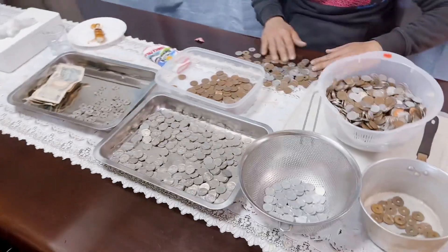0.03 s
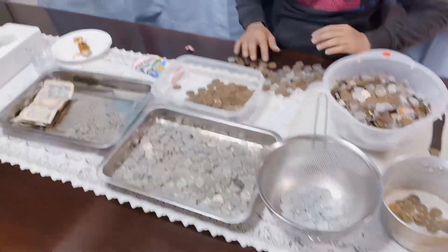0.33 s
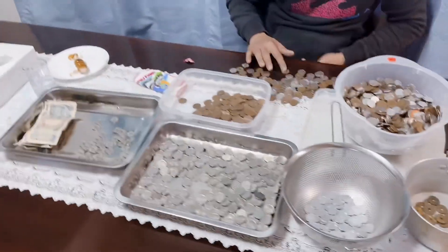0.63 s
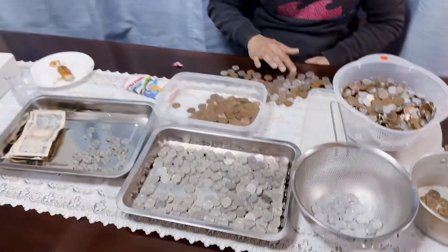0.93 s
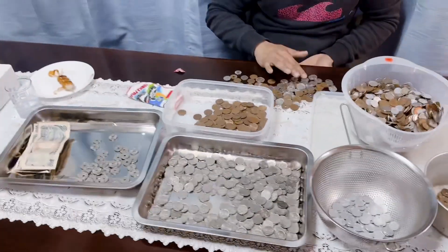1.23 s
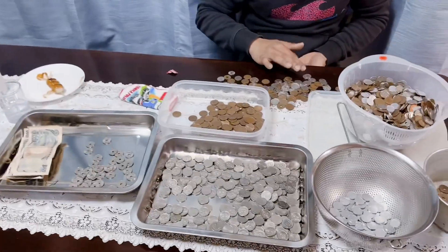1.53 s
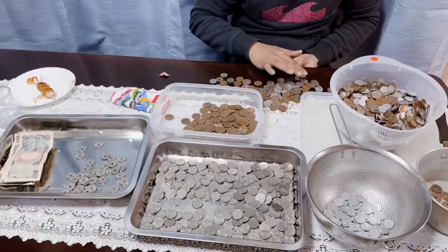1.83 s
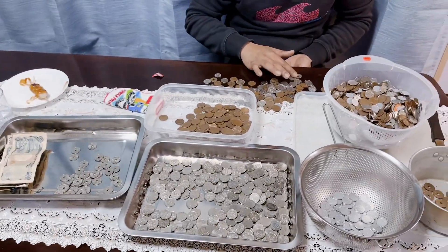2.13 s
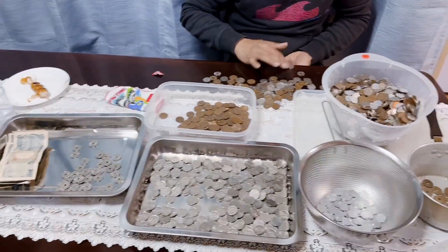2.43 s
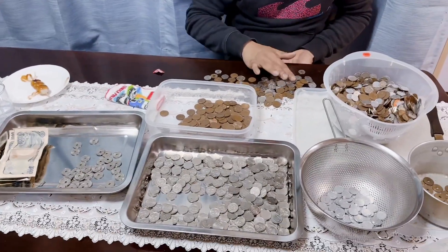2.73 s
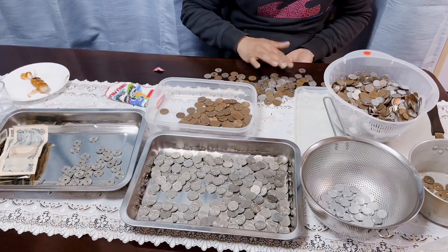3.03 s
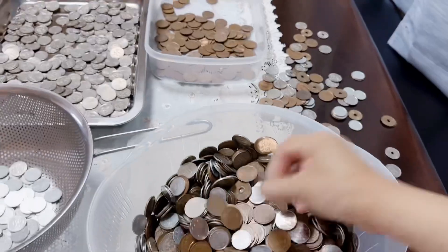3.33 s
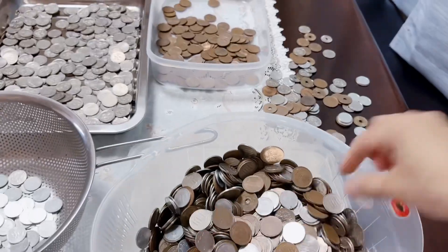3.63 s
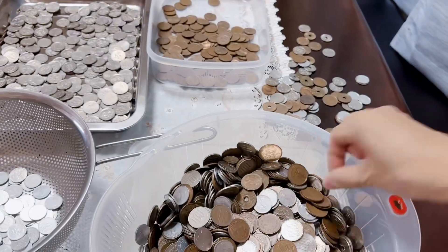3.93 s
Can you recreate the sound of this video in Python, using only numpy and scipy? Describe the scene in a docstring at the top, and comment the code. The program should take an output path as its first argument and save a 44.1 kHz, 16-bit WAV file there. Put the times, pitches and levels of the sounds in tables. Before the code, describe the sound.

Coins scrape and tap on a wooden table as fingers sort them, a few steps away in a small humming room. Then, close up, a hand digs into a plastic tub of coins and drops more in.

```python
"""Coins on wood and in a tub

A few steps away in a small, humming room, fingers slide and set down coins on a wooden table,
and two coins click in the hand. Then, close by, a hand digs into a plastic tub of coins and drops
more onto the heap. Collisions and stick-slip friction drive the resonances: wood and plastic
sound the lower notes, the metal ticks and rings high above them."""
import sys
import numpy as np
from scipy import signal
from scipy.fft import rfft, irfft
from scipy.io import wavfile
from scipy.ndimage import map_coordinates

SR = 44100
rng = np.random.default_rng(int(sys.argv[2]) if len(sys.argv) > 2 else 0)


def bounce(signal):
    """Save signal as a 16-bit WAV file at the path given by the first command-line argument."""
    frames = np.transpose(np.atleast_2d(signal))
    limited = np.clip(frames, -1, 1)
    pcm = np.round(limited * 32767).astype(np.int16)
    wavfile.write(sys.argv[1], SR, pcm)


N = 176400


def amp(db):
    """Amplitude ratio of a level in decibels."""
    return 10 ** (np.asarray(db) / 20)


def unit(x):
    """Normalisation to unit energy."""
    return x / np.sqrt(np.sum(x ** 2) + 1e-20)


def read(points, hz):
    """Interpolation of rows (f/Hz, value) on a logarithmic frequency axis."""
    f, value = np.transpose(points)
    return np.interp(np.log(hz + 1), np.log(f + 1), value)


def add(mix, s, sound):
    """Superposition: a sound joins the mix at s seconds."""
    part = mix[max(round(s * SR), 0):][:len(sound)]
    part += sound[:len(part)]


def above(x, hz):
    """Third-order high-pass filter."""
    return signal.sosfilt(signal.butter(3, hz, "high", fs=SR, output="sos"), x)


def below(x, hz):
    """Second-order low-pass filter."""
    return signal.sosfilt(signal.butter(2, min(hz, SR / 3), fs=SR, output="sos"), x)


def colour(spectrum, size=2048):
    """Minimum-phase impulse response: the phase follows from the log gain by Hilbert transform."""
    log_gain = np.log(amp(read(spectrum, abs(np.fft.fftfreq(size, 1 / SR)))))
    transfer = np.exp(np.conj(signal.hilbert(log_gain)))
    return unit(np.fft.ifft(transfer).real[:size // 2])


def band(hz, width_hz, size):
    """Narrow-band noise of rms 1: its components beat, so it sounds like a wavering tone."""
    f = np.fft.rfftfreq(N, 1 / SR)
    spectrum = rfft(rng.standard_normal(N)) / (1 + (2 * (f - hz) / width_hz) ** 4)
    return unit(irfft(spectrum, N)[:size]) * np.sqrt(size)


def air(spectrum, db, hums):
    """Stationary room noise: a continuous spectrum plus narrow bands of hum."""
    gain = amp(read(spectrum, np.fft.rfftfreq(N, 1 / SR)))
    noise = unit(irfft(rfft(rng.standard_normal(N)) * gain, N)) * np.sqrt(N)
    return amp(db) * noise + sum(amp(hum_db) * band(hz, width, N) for hz, width, hum_db in hums)


def far_air():
    """Ambient noise a few steps from the table, humming mainly near 120 Hz."""
    spectrum = [(20, -29), (45, -4.5), (120, -4), (230, -13.5), (600, -15.5), (1900, -20), (4200, -30.5),
                (6200, -42.5), (10200, -46), (11800, -59), (14000, -48), (16000, -55)]  # noise: f/Hz, relative level/dB
    hums = [(60, 3.6, -69), (119.6, 25.5, -49)]  # hum bands: f/Hz, width/Hz, level/dB
    return air(spectrum, db=-45, hums=hums)


def near_air():
    """Ambient noise beside the tub, with one low hum and one in the midrange."""
    spectrum = [(25, -33), (50, -15.5), (90, -1), (220, -12.5), (560, -12.5), (700, -19), (1200, -19),
                (1600, -29), (2300, -33.5), (5000, -45), (9500, -49), (11500, -57), (16000, -49)]  # noise: f/Hz, relative level/dB
    hums = [(60, 2.6, -56), (521, 5, -57)]  # hum bands: f/Hz, width/Hz, level/dB
    return air(spectrum, db=-47.5, hums=hums)


def room(x, early_db, tail_db, tails=3, hand_moves_per_s=4):
    """Reverberation: early reflections, then a diffuse tail whose treble is absorbed first."""
    echoes = [(.0062, -3), (.0074, -20), (.0092, -5.5), (0.0183, -16)]  # reflections: delay/s, level/dB re early_db
    decay_times = [(150, 1), (1000, 0.39), (2500, 0.36), (6000, 0.32), (10000, 0.24), (15000, 0.17)]  # reverberation time: f/Hz, T60/s
    out = x.copy()
    for delay, db in echoes:
        add(out, delay, amp(db + early_db) * x)
    moves = np.arange(N) / SR * hand_moves_per_s
    for k in range(tails):
        hz, t, noise = signal.stft(rng.standard_normal(SR * 3 // 4), SR, nperseg=256)
        envelope = amp(-60 * t / read(decay_times, hz)[:, None]) * np.minimum(t / 0.0067, 1)
        tail = signal.istft(noise * envelope, SR, nperseg=256)[1]
        share = np.cos(np.pi * (moves + k / tails)) * np.sqrt(2 / tails)  # shifts as the hands move
        out += amp(tail_db) * signal.fftconvolve(x * share, unit(tail))[:N]
    return out


def thumps():
    """Soft impact: hands bumping the table excite only a brief, low boom."""
    bumps = [(.293, 0.089, -36.5, 136.5), (0.764, 0.08, -38.5, 118.2), (3.124, 0.076, -38.5, 97.4)]  # hand bumps: t/s, duration/s, level/dB, f/Hz
    out = np.zeros(N)
    for s, length, db, hz in bumps:
        t = np.arange(0, length, 1 / SR)
        boom = np.sin(2 * np.pi * hz * t) + 0.53 * band(hz, width_hz=120, size=len(t))
        swell = np.sin(np.pi * (t / length) ** 0.67)
        add(out, s, amp(db) * np.sqrt(len(t)) * unit(boom * swell))
    return out


def ring(modes, t60_s, size=8192):
    """Free vibration: each mode (f/Hz, relative level/dB) is an exponentially damped sine."""
    t = np.arange(size) / SR
    return unit(sum(amp(db - 60 * t / t60_s) * np.sin(2 * np.pi * (hz * t + rng.random()))
                    for hz, db in modes))


def coin(hz, spread_hz, count=9):
    """Mode cluster: touching coins of one kind ring at nearly one pitch; more coins, wider spread."""
    offsets = np.linspace(-1, 1, count) + rng.uniform(-0.71, 1, count) / count
    return ring([(hz + spread_hz * z, -9 * z ** 2) for z in offsets], t60_s=0.019)


def patchy(x, patch_hz=415.5, patch_s=0.00603, depth_db=2.5):
    """Spectral modulation: the colour flickers as the contact wanders from coin to coin."""
    hz, t, spectrum = signal.stft(np.pad(x, (0, 256)), SR, nperseg=256)
    grid = np.meshgrid(hz / patch_hz, t / patch_s, indexing="ij")
    field = map_coordinates(rng.standard_normal((128, 128)), grid, order=1, mode="mirror")
    flicker = amp(depth_db * field / field.std())
    return np.linalg.norm(x) * unit(signal.istft(spectrum * flicker, SR, nperseg=256)[1])


def contact(decay_s, size=1024):
    """Hard contact: a spray of tiny collisions, over in milliseconds and therefore broadband."""
    age = np.arange(size) / SR / decay_s
    fade = np.sqrt(age) * np.exp(-age)
    spectrum = rfft(rng.standard_normal(size) * fade)
    whitened = irfft(spectrum / abs(spectrum))
    return unit(whitened * np.sqrt(fade)) * np.sqrt(0.0019 * SR)  # the energy of 1.9 ms at rms 1


def slips(length, per_s, spread_db=3.5, rise_s=0.0034, fall_s=0.014):
    """Stick-slip friction: a random train of uneven impulses under a stroke that rises and fades."""
    t = np.arange(0, length, 1 / SR)
    chance, strength, sign = rng.random((SR // 2, 3))[:len(t)].T
    height = amp(spread_db * np.minimum(-np.log(strength), 3))
    train = (chance < per_s / SR) * np.sign(sign - .5) * height
    stroke = np.minimum(t / rise_s, 1) * np.minimum((length - t) / fall_s, 1)
    return patchy(unit(train * stroke) * np.sqrt(len(t)))


def excite(drive, parts, size=32768):
    """Forced response: convolution with each part (impulse response, level/dB re the drive)."""
    spectrum = rfft(drive, size)
    responses = (amp(db) * unit(irfft(spectrum * rfft(response, size))) for response, db in parts)
    return np.linalg.norm(drive) * sum(responses)


def hand_clicks():
    """Light damping: coin clicks on coin in the fingers, and the loosely held one rings on."""
    # coin clicks: t/s, level/dB; the last row is a second contact of the coins just after the second click
    clicks = [(1.5165, -20), (2.6161, -27.5), (2.6226, -29)]
    click_spectrum = [(1000, -27), (3200, -16), (4500, -9), (6200, -7.5), (7700, 5), (9200, -4), (10600, 6),
                      (11800, -19), (13500, -5), (16000, -8)]  # metal on metal: f/Hz, relative level/dB
    out = np.zeros(N)
    for s, db in clicks:
        pulse = contact(decay_s=0.0011)
        metal = ring([(10640, 0)], t60_s=.45, size=16384)
        add(out, s, amp(db) * excite(pulse, [(colour(click_spectrum), 0), (metal, -15.5)]))
    return room(out, early_db=0.0, tail_db=-1.5)


def table_coins(table_t60_s=0.07):
    """Impact and friction drive the table top as a soundboard, while the coins tick and ring."""
    # coins set down: t/s, tick level/dB, wood level/dB, ring f/Hz, ring level/dB re tick
    knocks = [(0.0237, -41, -28, 10900, 3), (0.0372, -29.5, -25, 13900, 4), (0.2046, -40, -30.5, 13100, 9),
              (0.5300, -43.5, -44, 10100, -9), (1.1807, -64, -42, 10700, -5), (1.3283, -49, -37, 8000, -6),
              (1.7863, -33, -29, 14200, -1), (1.8748, -40, -43, 14000, -6),
              (1.8792, -25.5, -20.5, 10430, -7.5), (1.9097, -35, -28.5, 11400, -4),
              (2.1452, -37, -33, 13900, -4), (2.1823, -38, -26.5, 14200, -9),
              (2.2118, -38, -31.5, 11400, -8), (2.2305, -37.5, -33, 11500, -4),
              (2.2890, -40, -33.5, 13100, -9), (2.3172, -37, -32.5, 11400, -12),
              (2.3380, -35.5, -32, 11480, 2.5), (2.8135, -31, -24, 14100, -11),
              (2.8591, -26.5, -21.5, 14400, -8)]
    # coins pushed: t/s, duration/s, wood level/dB, lowest wood f/Hz, hiss level/dB,
    # ring f/Hz, ring level/dB re hiss
    slides = [(0.0, 0.057, -40.5, 590, -48, 12800, -3), (0.037, 0.077, -34, 496, -40, 13400, -2),
              (0.101, 0.048, -33.5, 650, -39, 13300, 2.5), (0.156, 0.1, -46.5, 700, -48, 13200, -0.5),
              (0.661, .15, -52.5, 1510, -69.5, 14000, -8), (0.95, 0.08, -47.5, 1490, -65.5, 14000, 3),
              (1.023, 0.043, -44, 1370, -64, 13800, -11), (1.149, 0.034, -55.5, 3200, -76, 10700, -11),
              (1.297, 0.085, -46, 1930, -59, 8000, -6), (1.79, 0.028, -34.5, 1850, -48.5, 14200, 5),
              (1.885, 0.074, -42, 1400, -48, 13900, -8), (2.142, 0.125, -46.5, 1320, -58, 11400, -14),
              (2.332, 0.095, -45.5, 1720, -53.5, 11500, -7), (2.725, 0.062, -39, 1090, -46, 10400, -2),
              (2.797, 0.087, -41.5, 1120, -46, 14200, -8), (2.81, 0.022, -32.5, 1310, -38.5, 14300, -11),
              (2.884, 0.22, -52, 1550, -64, 10600, -16)]
    tick_spectrum = [(1000, -58), (3000, -15.5), (4700, 3.5), (6500, -0.5), (8500, 2), (10500, -1.5),
                     (11900, -9.5), (13500, 0), (14500, -1.5), (16000, -9)]  # broad response of a coin: f/Hz, relative level/dB
    wood_spectrum = [(150, -29.5), (500, -5), (750, -2.5), (1250, -4), (1600, -1), (2100, -1), (3000, -2.5),
                     (4500, -7.5), (6200, -24), (12000, -60.5)]  # broad response of the wood: f/Hz, relative level/dB
    table_modes = [(1195, -3), (1328, 0.5), (1621, -14.5), (2120, 2.5), (2186, -7), (2850, -10), (3680, -6)]  # resonances of the top: f/Hz, relative level/dB
    out = np.zeros(N)
    tick = colour(tick_spectrum)
    wood = amp(-14.5) * ring(table_modes, table_t60_s)
    add(wood, 0, colour(wood_spectrum))
    rap = above(wood, hz=1180)
    for s, db, wood_db, hz, ring_db in knocks:
        blow = patchy(contact(decay_s=0.0021))
        metal = coin(hz, spread_hz=240)
        add(out, s, excite(blow, [(rap, wood_db), (tick, db), (metal, db + ring_db)]))
    for s, length, wood_db, lowest_hz, db, hz, ring_db in slides:
        top_hz = 4490 * 2 ** ((wood_db + 30) / 23)  # a lighter push is duller: an octave per 23 dB
        scrape = below(above(wood, lowest_hz), top_hz)
        friction = slips(length, per_s=1300)
        metal = coin(hz, spread_hz=600)
        add(out, s, excite(friction, [(scrape, wood_db), (tick, db), (metal, db + ring_db)]))
    # a coin pressed hard as it is dragged chatters and keeps the top ringing
    chatter_at_s, chatter_db = 2.727, -43.5
    modes = [(ring([(hz, 0)], table_t60_s), chatter_db + db) for hz, db in table_modes]
    add(out, chatter_at_s, excite(slips(length=.11, per_s=400), modes))
    return room(out, early_db=-7.5, tail_db=-1.5)


def tub_coins():
    """Collisions and slips in the heap ring the coins and force the plastic tub into vibration."""
    # coins striking the heap: t/s, tick level/dB, tub level/dB, ring f/Hz, ring level/dB re tick
    clinks = [(3.1113, -31.5, -45, 13400, -6), (3.1224, -26, -46, 13400, -7), (3.1405, -25, -39, 12900, -4),
              (3.1617, -18, -37, 13600, -0.5), (3.178, -20, -33, 13500, -2), (3.2217, -35, -43, 14300, 3),
              (3.2527, -34, -46, 12900, 6), (3.265, -24.5, -37, 13400, -3), (3.3086, -29, -40, 12950, 5.5),
              (3.3825, -35, -45, 13050, 4.5), (3.7335, -21, -29, 14300, -16), (3.792, -30, -30, 13900, -11),
              (3.8485, -19, -19.5, 13300, -6), (3.856, -18.5, -21, 13100, -5),
              (3.8748, -22.5, -32, 13500, -6)]
    # the heap shifting: t/s, duration/s, tub level/dB, hiss level/dB, ring f/Hz, ring level/dB re hiss
    shifts = [(3.124, 0.035, -38, -29.5, 13200, 1), (3.178, 0.071, -39.5, -31, 14200, -3),
              (3.247, 0.048, -44.5, -36, 13500, -6), (3.731, 0.067, -35, -33.5, 14000, -12),
              (3.834, 0.043, -35.5, -35.5, 14200, -12), (3.866, 0.029, -43, -40, 14200, -3)]
    heap_spectrum = [(1000, -41.5), (2500, -12), (4200, -2.5), (6000, -7.5), (9300, 1), (11000, -4),
                     (11900, -16), (13100, 1.5), (14300, -3), (16000, -1.5)]  # response of the piled coins: f/Hz, relative level/dB
    tub_spectrum = [(150, -22), (550, -3.5), (800, -5.5), (1100, 2.5), (1450, -12), (1850, -3.5), (2800, 1),
                    (3600, 4), (5000, -2.5), (10000, -41.5)]  # response of the plastic: f/Hz, relative level/dB
    out = np.zeros(N)
    heap, tub = colour(heap_spectrum), colour(tub_spectrum)
    for s, db, tub_db, hz, ring_db in clinks:
        blow = contact(decay_s=0.0017)
        metal = coin(hz, spread_hz=300)
        add(out, s, excite(blow, [(tub, tub_db), (heap, db), (metal, db + ring_db)]))
    for s, length, tub_db, db, hz, ring_db in shifts:
        jingle = slips(length, per_s=3000)
        metal = coin(hz, spread_hz=750)
        add(out, s, excite(jingle, [(tub, tub_db), (heap, db), (metal, db + ring_db)]))
    return room(out, early_db=-9.5, tail_db=-8.5)


def scene():
    """Two listening distances in turn: the table from afar, a brief gap, then the tub close by."""
    jump_s, gap_s = 3.102, 0.0055
    t = np.arange(N) / SR
    far = table_coins() + hand_clicks() + far_air()
    near = tub_coins() + near_air()
    fade_out = np.clip((jump_s - t) / 0.0014, 0, 1)
    fade_in = np.clip((t - jump_s - gap_s) / 0.0018, 0, 1)
    return (far * fade_out + near * fade_in + thumps())[None]


def record(dry):
    """Band limiting: a steep linear-phase low-pass removes the highest treble."""
    edge_hz = 15830
    low_pass = signal.firwin(401, edge_hz, window=("kaiser", 9), fs=SR)
    return signal.oaconvolve(dry, low_pass[None], "same")


dry = scene()
out = record(dry)
bounce(out)
```